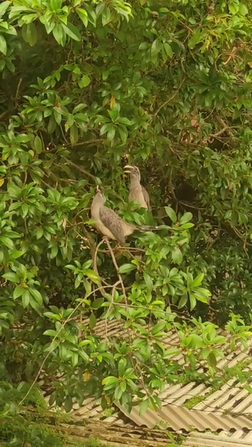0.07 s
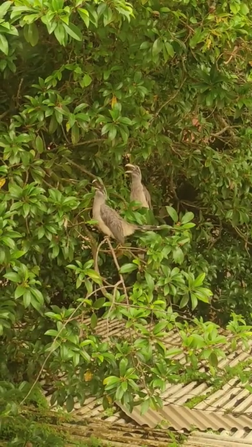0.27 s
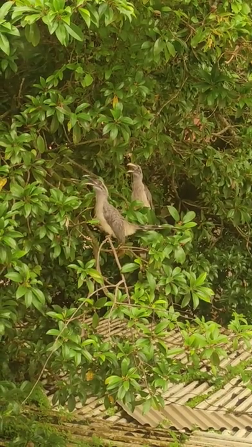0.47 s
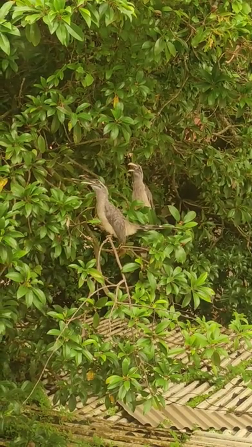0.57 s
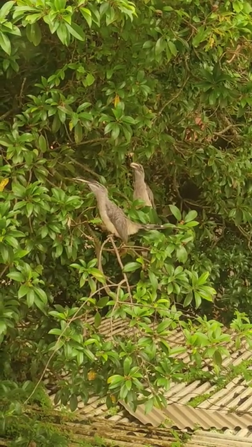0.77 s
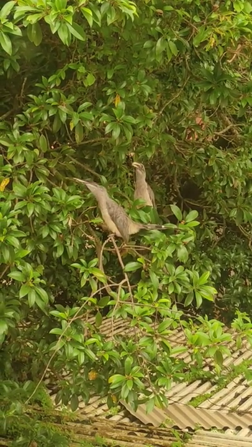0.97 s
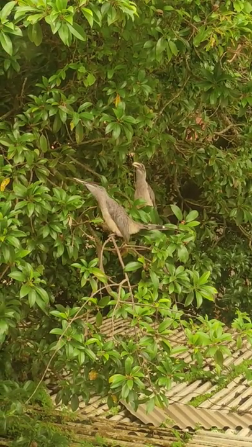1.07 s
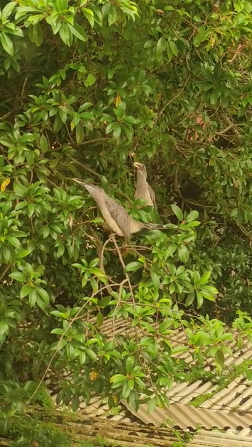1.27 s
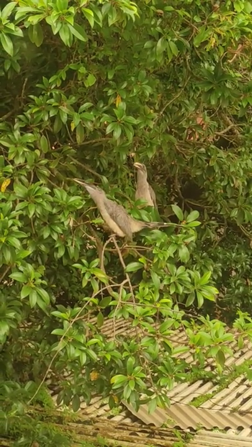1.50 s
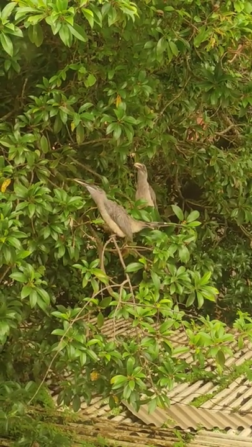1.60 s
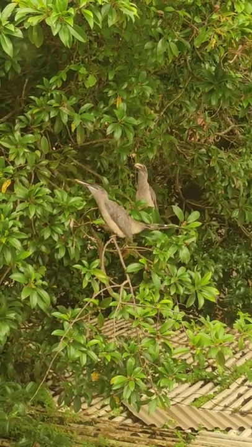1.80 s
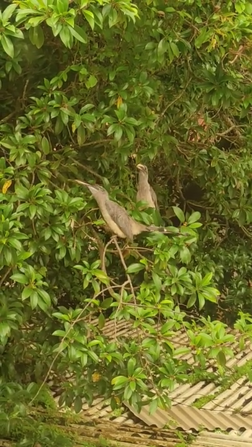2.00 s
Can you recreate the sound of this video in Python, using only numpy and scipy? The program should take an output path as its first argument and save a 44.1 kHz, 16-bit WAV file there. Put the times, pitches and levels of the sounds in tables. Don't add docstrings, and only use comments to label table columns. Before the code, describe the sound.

A large bird gives a single raspy, nasal squeal outdoors, echoing briefly off leaves and roof.

```python
import sys
import numpy as np
from scipy import signal
from scipy.fft import rfft, irfft, next_fast_len
from scipy.io import wavfile
from scipy.ndimage import uniform_filter1d, minimum_filter1d, map_coordinates

SR = 44100
rng = np.random.default_rng(int(sys.argv[2]) if len(sys.argv) > 2 else 0)


def persist_wave(psi):
    counts = np.round(np.clip(psi, -1, 1) * 32767).astype(np.int16)
    wavfile.write(sys.argv[1], SR, np.atleast_2d(counts).T)


def amplitude_ratio(level_db):
    exponent = np.asarray(level_db, float) / 20
    return 10 ** exponent


N = 90404

# (time [s], pitch [Hz])
FIRST_SIDE_PITCH = [(.195, 955), (.225, 994), (.27, 978), (.3, 960), (.33, 948), (.38, 915), (.415, 901),
                    (.59, 880), (.69, 884)]
# (time [s], pitch [Hz])
SECOND_SIDE_PITCH = [(.345, 897), (.38, 887), (.425, 886), (.47, 867), (.53, 851), (.6, 845), (.695, 845),
                     (.765, 815)]
# (time [s], breath share [0-1], pitch scatter [fraction])
HOARSENESS = [
    (.19, .55, .016),
    (.25, .38, .014),
    (.29, .1, .006),
    (.34, .01, .003),
    (.42, 0, .002),
    (.61, 0, .002),
    (.66, .1, .004),
    (.71, .17, .009),
    (.77, .22, .014),
]


def first_side():
    # (time [s], level [dB])
    effort = [
        (.195, -57),
        (.225, -44.5),
        (.28, -44),
        (.33, -46),
        (.38, -45.5),
        (.415, -44.5),
        (.5, -45),
        (.59, -47.5),
        (.69, -50.5),
    ]
    # (early level [dB], late level [dB])
    overtones = [(-3, -6), (4.5, -8.5), (-6.5, 1), (-2.5, -8), (-4.5, -12.5), (-12, -21.5), (-12, -15),
                 (-5.5, -27), (-14.5, -25), (-19, -28), (-34, -25), (-33, -38)]
    long_orders = [2, 5, 6, 7, 9, 10, 11, 13, 14]
    long_db = [-18.5, -3.5, -2.5, -30, -10, -12.5, -23, -30, -40]
    long_on_s, long_off_s, clear_s = 0.266, 0.376, 0.39

    effort_db, gate = curves(effort)
    turn = phase(FIRST_SIDE_PITCH)
    late = switch_at(clear_s)
    long_period = switch_at(long_on_s) - switch_at(long_off_s)
    thirds_only = switch_at(long_on_s) - late
    tones = np.zeros(N)
    for order, (early_db, late_db) in enumerate(overtones, start=2):
        tone = stack(turn, [order], [early_db + late * (late_db - early_db)])
        tones += tone if order % 3 == 0 else tone * (1 - thirds_only)
    tones += long_period * stack(turn * 3 / 4, long_orders, long_db)
    return gate * amplitude_ratio(effort_db) * voiced(tones, turn)


def second_side():
    # (time [s], level [dB])
    effort = [
        (.345, -44),
        (.38, -42.5),
        (.425, -41),
        (.47, -40.5),
        (.55, -50.5),
        (.575, -43),
        (.62, -47),
        (.7, -43.5),
        (.765, -53),
    ]
    # (level at the break [dB], level held [dB], level in the release [dB])
    overtones = [(-19, -10.5, -4.5), (-4, -4.5, -7.5), (-4.5, -9.5, 3.5), (-2, -1, -8), (1, -13, -8.5),
                 (-17, -13.5, -13), (-24, -14.5, -19), (-6, -24.5, -35), (-17, -23, -19), (-20, -25.5, -26),
                 (-19, -28.5, -37), (-34, -36, -33)]
    settle_s, release_s = 0.375, 0.702

    effort_db, gate = curves(effort)
    turn = phase(SECOND_SIDE_PITCH)
    held, released = switch_at(settle_s), switch_at(release_s)
    levels_db = [break_db + held * (held_db - break_db) + released * (release_db - held_db)
                 for break_db, held_db, release_db in overtones]
    orders = np.arange(len(overtones)) + 2
    return gate * amplitude_ratio(effort_db) * voiced(stack(turn, orders, levels_db), turn)


def phase(pitch):
    scatter = curves(HOARSENESS)[1]
    unsteady = 1 + scatter * (0.6 * wobble(110) + wobble(350))
    return 2 * np.pi * np.cumsum(curves(pitch)[0] * unsteady) / SR


def stack(turn, orders, levels_db):
    flutter_db, flutter_hz = 3, 39.98
    tones = np.zeros(N)
    for order, db in zip(orders, levels_db):
        loudness = amplitude_ratio(db + flutter_db * wobble(flutter_hz))
        tones += loudness * np.sin(order * turn + 2 * np.pi * rng.random())
    return tones


def voiced(tones, turn):
    # (frequency [Hz], level [dB per Hz])
    rasp_spectrum = [(880, -60), (1500, -29.5), (1910, -9.5), (2200, -14), (2910, -9.5), (4080, -9),
                     (5440, -16), (10400, -48), (12000, -46), (15600, -72), (22000, -120)]
    rasp_db = 2
    share = curves(HOARSENESS)[0]
    puffs = rng.standard_normal(N) * (1 + np.cos(turn))
    rasp = unit(filtered(puffs, lambda hz: amplitude_ratio(along(rasp_spectrum, hz))))
    return (1 - share) * tones + share * amplitude_ratio(rasp_db) * rasp


def trees(call):
    # (frequency [Hz], t60 [s])
    decay = [(1500, 0.84), (4000, 0.6), (7000, 0.68), (12000, 0.22)]
    stir_s = 0.08
    tail_db, roof_db, roof_s = -2, -5.5, 0.028
    out, now = np.zeros((2, N)), np.arange(N) / SR
    for centre_s in np.arange(FIRST_SIDE_PITCH[0][0], SECOND_SIDE_PITCH[-1][0] + stir_s, stir_s):
        hz, t, z = signal.stft(rng.standard_normal((2, SR * 3 // 4)), SR, nperseg=256)
        fading = z * amplitude_ratio(-60 * t / along(decay, hz)[:, None])
        tail = signal.istft(fading, SR, nperseg=256)[1]
        near = rng.standard_normal(tail.shape) * np.exp(-np.arange(tail.shape[1]) / SR / roof_s)
        echo = amplitude_ratio(tail_db) * tail / np.linalg.norm(tail[0])
        echo = echo + amplitude_ratio(roof_db) * near / np.linalg.norm(near[0])
        piece = call * np.cos(np.pi / 2 * np.clip((now - centre_s) / stir_s, -1, 1))
        delayed = np.pad(piece, (200, 0))[None]
        out += signal.fftconvolve(delayed, echo, axes=1)[:, :N]
    return out


def engine():
    # (pitch [Hz], level [dB], start [s], end [s])
    passes = [
        (78.2, -67.5, 0.14, 1.4),
        (152, -60.5, 1.035, 1.6),
    ]
    t = np.arange(N) / SR
    out = np.zeros(N)
    for hz, db, start_s, end_s in passes:
        progress = np.clip((t - start_s) / (end_s - start_s), 0, 1)
        loudness = amplitude_ratio(db + 1.2 * wobble(4.3)) * np.sqrt(np.abs(np.sin(np.pi * progress)))
        out += loudness * np.sin(2 * np.pi * np.cumsum(hz * (1 + 0.0302 * wobble(9.8))) / SR)
    return out


def far_bird():
    # (time [s], length [s], centre [Hz], level [dB])
    chirps = [
        (1.686, 0.066, 2150, -69),
    ]
    t = np.arange(N) / SR
    out = np.zeros(N)
    for start_s, length_s, centre_hz, db in chirps:
        swell = np.sin(np.pi * np.clip((t - start_s) / length_s, 0, 1))
        band = filtered(rng.standard_normal(N), lambda hz: np.exp(-((hz - centre_hz) / 500) ** 2))
        out += amplitude_ratio(db) * swell * unit(band)
    return out


def traffic_hum():
    # (frequency [Hz], level [dB per Hz])
    hum_spectrum = [(12, -59), (20, -10), (71, -3), (124, -5), (151, -4), (280, -9.5), (376, -9.5),
                    (488, -7.5), (800, -13.5), (1040, -17), (1760, -120)]
    return amplitude_ratio(-57 + 0.86 * wobble(5.6)) * rush(hum_spectrum, patchy_db=0.85)


def air_hiss():
    # (frequency [Hz], level [dB per Hz])
    air_spectrum = [(350, -1.5), (600, -8.5), (903, -7.5), (1380, -6.5), (1930, -9), (2750, -13),
                    (3820, -16.5), (5150, -22), (15500, -32)]
    return amplitude_ratio(-65.5) * rush(air_spectrum, patchy_db=0.5)


def rush(spectrum, patchy_db):
    # (frequency [Hz], likeness [0-1])
    likeness = [(40, 0.17), (130, 0.62), (300, 0.87), (640, 0.43), (1400, 0.12), (3000, 0.039)]
    z = signal.stft(rng.standard_normal((2, N)), nperseg=512)[2]
    patches = uniform_filter1d(rng.standard_normal(z.shape[1:]), size=5, axis=0)
    patches = uniform_filter1d(patches, size=12, axis=1)
    pair = signal.istft(z * amplitude_ratio(patchy_db * unit(patches)), nperseg=512)[1][:, :N]

    def mid_and_side(hz):
        angle = np.arccos(np.clip(along(likeness, hz), -1, 1)) / 2
        return amplitude_ratio(along(spectrum, hz)) * [np.cos(angle), np.sin(angle)]

    mid, side = filtered(pair, mid_and_side)
    out = lagged(np.array([mid + side, mid - side]), 0.00042)
    return out / np.std(out.mean(axis=0))


def unit(x):
    return x / np.sqrt(np.mean(x ** 2) + 1e-20)


def along(points, hz):
    f, v = np.transpose(points)
    return np.interp(np.log(hz + 1), np.log(f + 1), v)


def curves(rows):
    s, *columns = np.transpose(rows)
    t = np.arange(N) / SR
    opening = np.clip((t - s[0]) / 0.0075 + 1, 0, 1)
    closing = np.clip((s[-1] - t) / 0.023 + 1, 0, 1)
    return [np.interp(t, s, column) for column in columns] + [opening * closing]


def switch_at(s):
    return 0.5 + 0.5 * np.tanh((np.arange(N) / SR - s) / 0.013)


def wobble(rate_hz):
    return map_coordinates(rng.standard_normal(N // 16), [np.arange(N) * rate_hz / SR])


def filtered(x, response):
    m = next_fast_len(N + SR // 2)
    return irfft(rfft(x, m) * response(np.fft.rfftfreq(m, 1 / SR)), m)[..., :N]


def lagged(x, lag_s):
    sides = np.array([[1], [-1]])
    return filtered(x, lambda hz: np.exp(-1j * np.pi * hz * lag_s * sides))


def masked(x):
    # (frequency [Hz], level under the neighbour [dB])
    threshold = [(1400, -32), (2400, -29), (3200, -25), (6000, -22), (12000, -20)]
    hz, _, z = signal.stft(x, SR, nperseg=1024, noverlap=768)
    power = (np.abs(z) ** 2).sum(axis=0)
    power = uniform_filter1d(uniform_filter1d(power, size=7, axis=0), size=5, axis=1)
    band = np.sqrt(np.abs(power))
    loudest = -minimum_filter1d(-band, size=45, axis=0)
    audible = band > amplitude_ratio(along(threshold, hz))[:, None] * loudest
    keep = audible | (hz < 1400)[:, None]
    return signal.istft(z * keep, SR, nperseg=1024, noverlap=768)[1][:, :N]


def scene():
    call = first_side() + second_side()
    direct = lagged(call, 0.000489)
    background = traffic_hum() + air_hiss() + engine() + far_bird()
    return direct + trees(call) + background


def band_limit(x):
    return signal.sosfilt(signal.butter(12, 15660, fs=SR, output="sos"), x)


def record(dry):
    mix = masked(dry)
    return band_limit(mix)


dry = scene()
out = record(dry)
persist_wave(out)
```